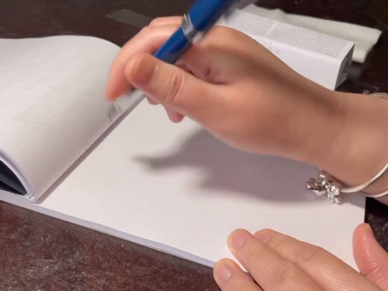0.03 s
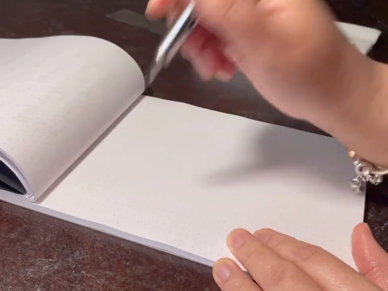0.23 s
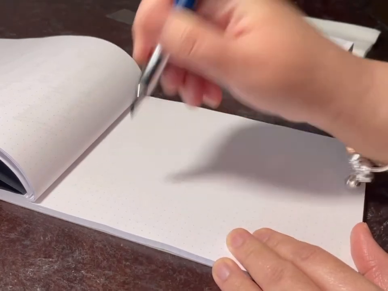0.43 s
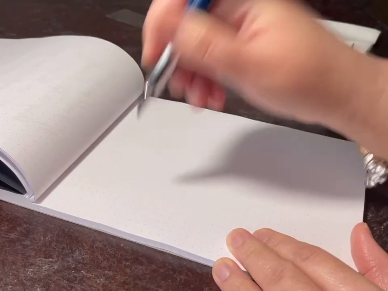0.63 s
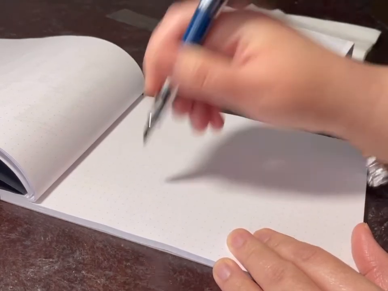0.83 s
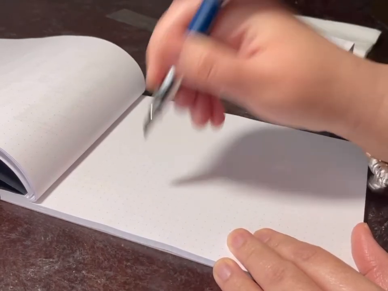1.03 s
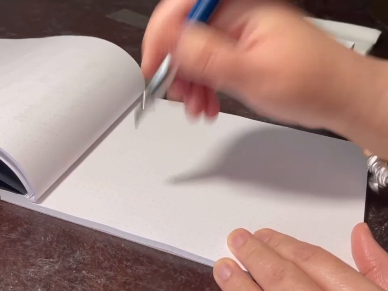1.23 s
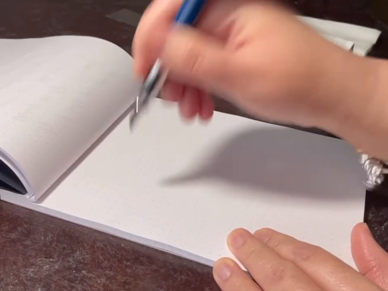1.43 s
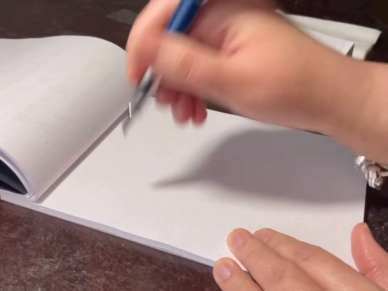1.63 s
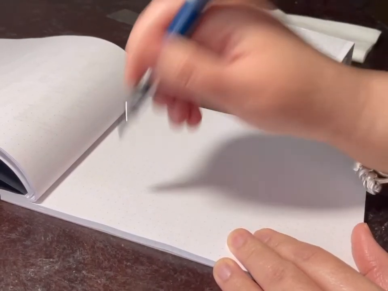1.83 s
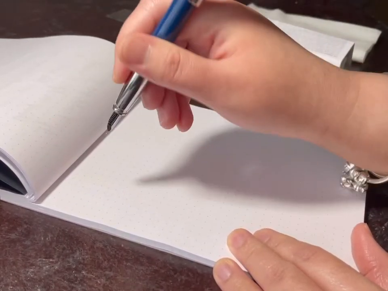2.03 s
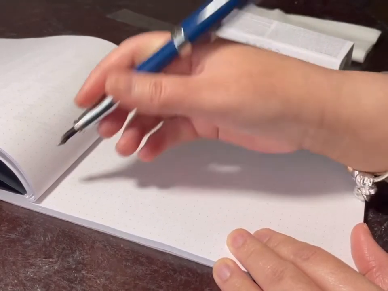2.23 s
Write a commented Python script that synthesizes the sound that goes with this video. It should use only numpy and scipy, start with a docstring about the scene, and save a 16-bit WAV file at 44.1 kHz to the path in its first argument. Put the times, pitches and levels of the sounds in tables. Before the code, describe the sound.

A pen nib scratching dryly on a notebook, knocking once as bracelet charms faintly clink.

```python
"""Fountain pen on a notebook

A dry nib scratches close to the microphone in quick, uneven strokes, plucking and catching on fibres.
The pen dabs the pad and once knocks hard through to the desk, which rings and booms. The hand slides
on the page, bracelet charms clink and the forearm thumps softly, in a small room with a low rumble."""
import sys
import numpy as np
from scipy import signal
from scipy.fft import rfft, irfft
from scipy.io import wavfile
from scipy.ndimage import uniform_filter1d

SR = 44100
rng = np.random.default_rng(int(sys.argv[2]) if len(sys.argv) > 2 else 0)


def to_wav(s):
    """Save 16-bit WAV."""
    ch = np.atleast_2d(s).T  # columns
    pcm = np.round(np.clip(ch, -1, 1) * 32767)  # PCM
    wavfile.write(sys.argv[1], SR, pcm.astype(np.int16))


N = 101429
TIME = np.arange(N) / SR

# Nib strokes. Each row: start in seconds, length in seconds, relative level in dB.
NIB_STROKES = [(.104, 0.054, -54.5), (.2725, 0.029, -40), (.326, 0.004, -39), (.478, 0.021, -50),
               (.501, 0.018, -38), (.712, 0.022, -34.5), (.953, 0.048, -48), (1.078, 0.019, -50.5),
               (1.131, 0.025, -43.5), (1.158, 0.026, -40), (1.27, 0.0094, -49.5), (1.297, 0.069, -46.5),
               (1.365, 0.013, -38), (1.425, 0.02, -46), (1.49, 0.028, -43.5), (1.522, 0.052, -46.5),
               (1.577, 0.015, -41), (1.597, 0.02, -44.5), (1.688, 0.016, -42.5), (1.72, 0.022, -46.5),
               (1.771, 0.035, -41.5), (1.882, 0.042, -42.5), (1.979, 0.0088, -36.5), (2.093, 0.0029, -41.5),
               (2.122, 0.0093, -37), (2.24, 0.1, -53)]
# The nib catches on a fibre. Each row: start in seconds, relative level in dB.
NIB_CATCHES = [(0.4629, -28.5), (0.4699, -23.5), (.583, -32), (0.68, -26.5), (0.69, -25.5), (0.7966, -30),
               (0.9403, -24), (0.959, -14.5), (0.9781, -21.5), (1.1591, -20), (1.176, -18.5),
               (1.221, -24.5), (1.288, -19.5), (1.303, -24.5), (1.3383, -21), (1.3453, -21), (1.366, -21),
               (1.382, -25), (1.3875, -16.5), (1.49, -20), (1.5052, -23.5), (1.524, -25), (1.5403, -15),
               (1.585, -20.5), (1.676, -27.5), (1.691, -27), (1.726, -37), (1.749, -14.5), (1.773, -23),
               (1.8, -21), (1.885, -20), (2.0543, -31), (2.121, -25), (2.136, -41), (2.229, -22),
               (2.267, -24.5)]
# The pen knocks on the pad, once hard. Each row: start in seconds, relative level in dB.
PEN_KNOCKS = [(0.52, -40), (0.7266, -10), (0.97, -37), (1.768, -34.5)]
# Soft landings of the pen. Each row: start in seconds, relative level in dB.
PEN_DABS = [(0.284, -20), (0.2879, -22.5), (.304, -26.5), (.969, -29)]
# Charms collide. Each row: start in seconds, relative level in dB.
CHARM_CLINKS = [(0.1015, -9.5), (.375, -14.5), (.77, -16.5), (0.8165, -17)]
# Hand moves. Each row: start in seconds, length in seconds, level in dB, pitch as a ratio.
HAND_SLIDES = [(0, 0.068, -54, 0.76), (0.079, 0.064, -47, 1.05), (0.29, 0.013, -42, 0.79),
               (0.32, 0.014, -53, 1), (1.84, 0.025, -56, 0.97), (1.874, 0.041, -42, 1.01),
               (1.942, 0.1364, -55, .93), (1.988, 0.021, -49, 1.04), (2.094, 0.1, -56.5, 1.05),
               (2.211, 0.051, -48, 0.99), (2.265, 0.035, -46.5, 0.86)]
# The forearm shifts its weight. Each row: start in seconds, level in dB.
ARM_BUMPS = [(0.048, -43.5), (0.459, -43), (0.537, -42.5), (1.842, -44)]
# Modes of pad and desk, and of a charm. Each row: pitch in Hz, relative level in dB, T60 in seconds.
DESK_MODES = [(290, -24.5, 0.22), (450, -19, 0.2), (692, -27, 0.29), (968, -19.5, 0.11), (1163, -17, 0.08),
              (1557, -17.5, 0.15), (1930, -15, 0.12), (2083, -7.5, 0.087), (2238, -8.5, 0.062),
              (3210, -12, 0.071), (3350, -6, 0.046), (3680, -12.5, 0.08)]
CHARM_MODES = [(4410, -13, 0.016), (7124, -9.5, 0.029), (8990, -8, 0.013), (10200, -11, 0.0018),
               (10590, -1.5, 0.017), (12840, -3.5, 0.021), (15100, -4, 0.011)]
# The tone colour of each source. Each row: frequency in Hz, relative gain in dB.
SCRATCH_EQ = [(100, -12.5), (500, -18), (1100, -25.5), (2100, -9.5), (2700, -12), (3400, -4), (4300, -6.5),
              (6500, -2.5), (8000, -4), (10500, -1), (13200, -5), (15400, -5), (16300, -23)]
CATCH_EQ = [(100, -39), (1100, -49), (2200, -10), (3500, -7), (6500, -2), (10500, 4), (13000, 1.5),
            (15500, 2.5), (16800, -3)]
KNOCK_EQ = [(60, -19.5), (400, -3.5), (560, -11.5), (780, -4.5), (1020, -1), (1750, -7), (2200, 3.5),
            (2950, -6.5), (3500, -6), (4800, -5), (9000, -20), (15000, -7.5), (17000, -36)]
DAB_EQ = [(60, -33), (350, -3), (600, 4), (1000, 4), (1550, 10.5), (2000, 8), (2800, -12.5), (8000, -8),
          (16000, -53)]
SLIDE_EQ = [(100, -7.5), (500, -16), (820, -3), (1080, -7), (1350, 2.5), (2000, -3.5), (2600, -12.5),
            (4800, -11), (9000, -19.5), (16000, -22.5)]
RUMBLE_EQ = [(20, -15), (40, -9), (60, 1.5), (90, -5), (130, -7), (190, -14.5), (280, -15.5), (420, -24.5),
             (1000, -33), (3000, -38), (8000, -27), (15000, -32.5), (17000, -76)]
# The room's decay. Each row: frequency in Hz, T60 in seconds.
ROOM_DECAY = [(100, 0.51), (500, 0.3), (2000, 0.27), (6000, 0.25), (15000, 0.13)]
# Lag between the microphone ports. Each row: frequency in Hz, left minus right phase in radians.
MIC_PHASE = [(0, 0), (900, 0), (1400, -.7), (3000, 0), (6000, -.3), (7200, -1.7), (7900, -3.1),
             (8400, -3.3), (9300, -4.6), (10800, -6.1), (12500, -6.6), (15000, -9.2), (17000, -9.5)]
# Stereo lean. Each row: frequency in Hz, left minus right level in dB.
MIC_BALANCE = [(100, -0.5), (300, 0.5), (1200, 1.5), (5000, 2.5), (9000, -0.5), (16000, 1)]


def nib_scratch(level_db=2, fibre_s=.004, graze_db=-65.5):
    """The nib plucks fibre after fibre in clumped runs, and barely grazes the sheet between strokes."""
    slips = grains(per_s=5000, spread_db=4)
    local_power = abs(uniform_filter1d(slips ** 2, size=250))
    slips = slips / np.sqrt(local_power + 0.038) * snags()  # even out, then clump
    fibre_under_nib = rng.integers(0, 32, N)[(TIME / fibre_s).astype(int)]
    plucks = unit(sum(fibre_ring(slips * (fibre_under_nib == k)) for k in np.unique(fibre_under_nib)))
    grazes = amp(graze_db) * grains(per_s=900, spread_db=13)
    strokes = amp(level_db) * plucks * pressure(NIB_STROKES, rise_s=0.001, fall_s=0.0076)
    return colour(strokes + grazes, SCRATCH_EQ)


def nib_catches(level_db=5, chatter=0.096, chatter_s=0.0034):
    """The nib snaps free of a fibre and chatters for a moment."""
    out, t = np.zeros(N), TIME[:1000]
    for start, db in NIB_CATCHES:
        snap = fibre_ring(fibre_ring(chatter * noise_burst(t, chatter_s)))
        snap[0] = 1  # the click of release
        add(out, start, amp(db + level_db) * snap)
    return colour(out, CATCH_EQ)


def fibre_ring(x, low_hz=2680, high_hz=15000, q=7.8, strength=1.7):
    """A snapping fibre rings briefly at a pitch of its own."""
    b, a = signal.iirpeak(rng.uniform(low_hz, high_hz), q, SR)
    return x + strength * signal.lfilter(b, a, x)


def snags(snag_s=.0009, drag=.18):
    """The paper's uneven grip: bursts of friction a few milliseconds long over a smooth drag."""
    t = TIME[:800]
    burst = t / snag_s * np.exp(-t / snag_s)
    power = signal.fftconvolve(grains(per_s=260, spread_db=2.6) ** 2, burst)[:N]
    power = abs(power) + drag * power.mean()
    return np.sqrt(power / uniform_filter1d(power, size=1100))


def grains(per_s, spread_db):
    """A crackle of tiny random slips of uneven size, at rms 1."""
    size = amp(spread_db * np.minimum(rng.exponential(1, N), 3.5))
    return unit(size * rng.choice([-1, 1], N) * (rng.random(N) < per_s / SR))


def pressure(contacts, rise_s, fall_s):
    """Each contact with the page rises, holds and dies away."""
    return sum(amp(db) * np.clip((TIME - start) / rise_s, 0, 1)
               * np.exp(-np.maximum(TIME - start - length, 0) / fall_s) for start, length, db in contacts)


def pen_landings(hits, eq, level_db, rattle, rattle_s):
    """The pen lands on the pad: one push, then a short rattle of the stacked sheets."""
    out, t = np.zeros(N), TIME[:16000]
    for start, db in hits:
        blow = signal.unit_impulse(len(t)) + rattle * noise_burst(t, rattle_s)
        add(out, start, amp(db + level_db) * blow)
    return colour(out, eq)


def desk_ring(level_db=-7, rise_s=0.0018):
    """Pad and desk ring briefly under each knock."""
    out, t = np.zeros(N), TIME[:16000]
    for start, db in PEN_KNOCKS:
        add(out, start, amp(db + level_db) * ring(DESK_MODES, t) * (1 - np.exp(-t / rise_s)))
    return out


def desk_boom(hz=131.6, level_db=-27.5, peak_s=0.036):
    """After a knock the desk top swells into its lowest note."""
    out, t = np.zeros(N), TIME[:16000]
    for start, db in PEN_KNOCKS:
        add(out, start, amp(db + level_db) * swell(t, peak_s) * np.sin(2 * np.pi * hz * t))
    return out


def charms(level_db=-8, vary_db=4, rebound=0.65, rebound_s=.0012, tick=0.22, tick_s=0.0017):
    """Small metal charms strike each other with a tick, ring and rebound once."""
    out, t = np.zeros(N), TIME[:4000]
    for start, db in CHARM_CLINKS:
        gain = amp(db + level_db)
        add(out, start, gain * ring(CHARM_MODES, t, vary_db))
        add(out, start, gain * tick * noise_burst(t, tick_s))
        add(out, start + rebound_s, rebound * gain * ring(CHARM_MODES, t, vary_db))
    return out


def hand_slides(grip=0.61):
    """Skin brushes the sheet in dull swishes; grip is the share of the rub that sticks and slips."""
    out = np.zeros(N)
    rub = rng.standard_normal(N) * (1 - grip + grip * snags())
    for start, length, db, pitch in HAND_SLIDES:
        swish = rub * pressure([(start, length, db)], rise_s=0.0025, fall_s=0.0061)
        out += colour(swish, np.array(SLIDE_EQ) * [pitch, 1])
    return out


def arm_bumps(hz=62, peak_s=0.01):
    """Soft, very low thumps of the forearm on the desk."""
    out, t = np.zeros(N), TIME[:8000]
    for start, db in ARM_BUMPS:
        add(out, start, amp(db) * swell(t, peak_s) * np.sin(2 * np.pi * (hz * t + rng.random())))
    return out


def room_rumble(level_db=-53, width=.24):
    """A low, steady bed of room noise, nearly alike on both sides."""
    mid, side = (unit(colour(rng.standard_normal(N), RUMBLE_EQ)) for _ in range(2))
    return amp(level_db) * (mic_ports(mid) + width * np.array([side, -side]))


def in_room(x, desk_db, room_db, width, desk_s=0.00054, tail_rise_s=0.0025):
    """Direct sound, quick reflections off the desk, and the room's short tail."""
    t = TIME[:20000]
    scatter = rng.standard_normal(len(t)) + width * rng.standard_normal((2, len(t)))
    early = scatter * (t > .0006) * np.exp(-t / desk_s)
    hz, age, spectrum = signal.stft(scatter[:, ::-1], SR, nperseg=256)
    decay = amp(-60 * age / curve(ROOM_DECAY, hz)[:, None])
    tail = signal.istft(spectrum * decay, SR, nperseg=256)[1][:, :len(t)]
    tail *= np.minimum(t / tail_rise_s, 1)
    echo = amp(desk_db) * early / np.linalg.norm(early[0]) + amp(room_db) * tail / np.linalg.norm(tail[0])
    direct = mic_ports(x)
    return direct + signal.fftconvolve(direct, echo, axes=1)[:, :N]


def mic_ports(x):
    """Sound reaches the two microphone ports with a small lag and a slight lean in level."""
    hz, spectrum = np.fft.rfftfreq(2 * N, 1 / SR), rfft(x, 2 * N)
    lean = amp(curve(MIC_BALANCE, hz) / 2)
    lag = np.exp(-1j * curve(MIC_PHASE, hz))
    return np.array([irfft(spectrum * lean)[:N], irfft(spectrum / lean * lag)[:N]])


def ring(modes, t, vary_db=0):
    """Dying sines of a struck object; vary_db shifts their strengths with where it is struck."""
    return sum(amp(db + vary_db * rng.uniform(-1.1, 1) - 60 * t / t60)
               * np.sin(2 * np.pi * (hz * t + rng.random())) for hz, db, t60 in modes)


def noise_burst(t, decay_s):
    """White noise with an instant attack and an exponential decay."""
    return rng.standard_normal(len(t)) * np.exp(-t / decay_s)


def swell(t, peak_s):
    """A rounded envelope that rises to 1 and fades."""
    return (t / peak_s * np.exp(1 - t / peak_s)) ** 2


def colour(x, eq):
    """A minimum-phase EQ of unit energy, which keeps attacks crisp."""
    log_gain = np.log(amp(curve(eq, abs(np.fft.fftfreq(2048, 1 / SR)))))
    taps = np.fft.ifft(np.exp(np.conj(signal.hilbert(log_gain)))).real
    return signal.fftconvolve(x, taps / np.linalg.norm(taps))[:len(x)]


def curve(points, hz):
    """Reads a table on a log-frequency axis."""
    point_hz, value = np.transpose(points)
    return np.interp(np.log(hz + 1), np.log(point_hz + 1), value)


def amp(db):
    """Decibels to gain."""
    return 10 ** (np.asarray(db) / 20)


def unit(x):
    """Scales to rms 1."""
    return x / np.sqrt(np.mean(x ** 2) + 1e-20)


def add(mix, start_s, sound):
    """Drops a sound into the mix at its cue."""
    part = mix[max(round(start_s * SR), 0):][:len(sound)]
    part += sound[:len(part)]


def scene():
    """Pen, bracelet and hand at the desk, over the room's rumble."""
    nib = in_room(nib_scratch() + nib_catches(), desk_db=-10.5, room_db=-10.5, width=1.6)
    bracelet = in_room(charms(), desk_db=-10.5, room_db=-12.5, width=0.91)
    cracks = pen_landings(PEN_KNOCKS, KNOCK_EQ, level_db=6, rattle=0.13, rattle_s=0.0044)
    knocks = in_room(cracks, desk_db=-2, room_db=0.5, width=1.83) + mic_ports(desk_ring()) + desk_boom()
    slides = hand_slides()
    dabs = pen_landings(PEN_DABS, DAB_EQ, level_db=9, rattle=0.077, rattle_s=0.0043)
    page = in_room(slides + dabs, desk_db=-4, room_db=-6.5, width=9)
    return nib + bracelet + knocks + page + arm_bumps() + room_rumble()


def record(dry):
    """A steep low-pass trims the very top of the treble."""
    lowpass = signal.firwin(511, cutoff=16150, window=("kaiser", 9), fs=SR)
    return signal.oaconvolve(dry, lowpass[None], "same")


dry = scene()
out = record(dry)
to_wav(out)
```